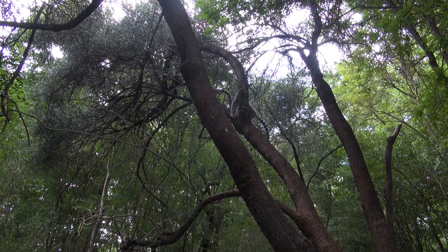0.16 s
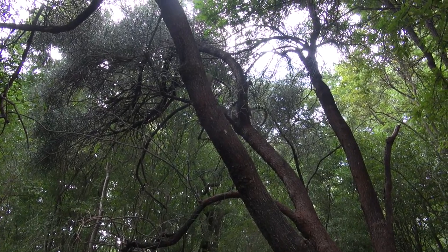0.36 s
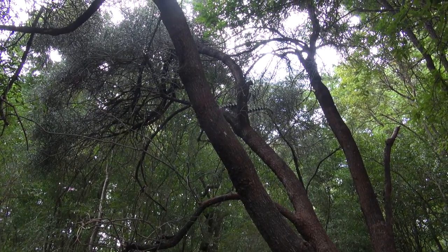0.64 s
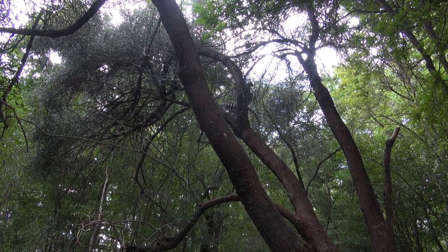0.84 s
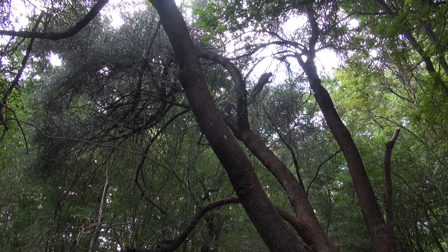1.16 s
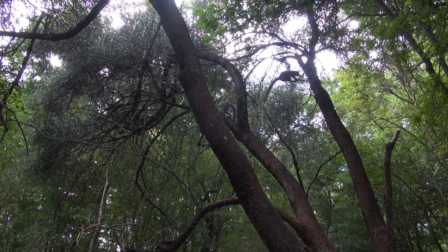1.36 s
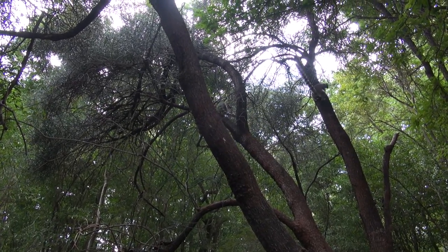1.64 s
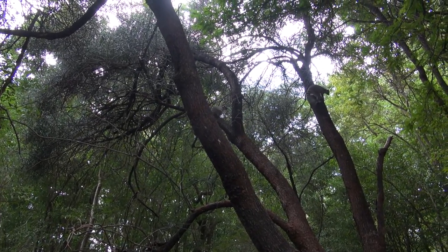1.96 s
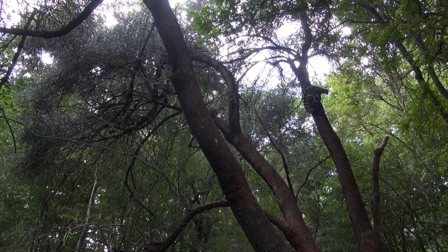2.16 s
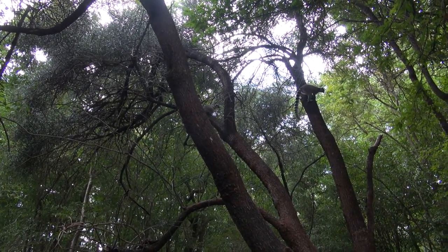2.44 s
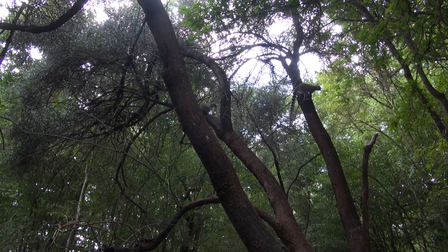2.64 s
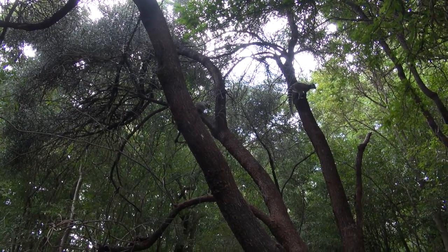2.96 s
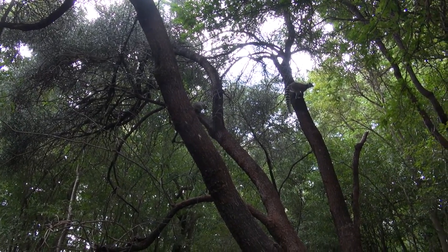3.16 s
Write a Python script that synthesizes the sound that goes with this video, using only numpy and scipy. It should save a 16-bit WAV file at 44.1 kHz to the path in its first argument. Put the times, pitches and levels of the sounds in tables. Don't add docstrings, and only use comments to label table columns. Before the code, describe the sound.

Lemur grunting softly in a forest, bark cracking and leaves rustling, a bird rasping four times

```python
import sys
import numpy as np
from scipy import signal
from scipy.fft import next_fast_len
from scipy.io import wavfile
from scipy.ndimage import uniform_filter1d

SR = 44100
rng = np.random.default_rng(int(sys.argv[2]) if len(sys.argv) > 2 else 0)


def attenuation_scalar(level_db):
    decades = np.asarray(level_db, float) / 20
    return 10 ** decades


def digitize_waveform(pressure):
    field = np.atleast_2d(pressure).T
    bounded = np.clip(field, -1, 1)
    quanta = np.round(bounded * 32767).astype(np.int16)
    wavfile.write(sys.argv[1], SR, quanta)


N = 145530

# (start [s], length [s], level [dB], pitch [Hz], roughness [0-1])
GRUNTS = [(-.012, 0.02, -51.5, 195.7, 0.33), (.4428, 0.023, -49.5, 241.5, 0.31),
          (.472, 0.013, -50, 279, 0.4), (.4825, 0.0069, -55, 349, 0.36), (.8485, 0.015, -44.5, 268.2, 0.24),
          (1.314, 0.013, -56.5, 184, 0.38), (1.453, 0.023, -45.5, 302, 0.37),
          (2.2705, 0.004, -60, 249, 0.23), (2.278, 0.0036, -54, 308, 0.35),
          (2.289, 0.0076, -50.5, 265, 0.34), (2.533, 0.015, -58.5, 206.3, 0.54),
          (2.881, 0.016, -55.5, 203.6, 0.09), (2.9998, 0.013, -46.5, 301, 0.29),
          (3.0162, 0.0098, -46, 261, 0.44), (3.033, 0.0089, -70, 288, 0.4)]
# (start [s], length [s], level [dB], pitch [Hz], roughness [0-1])
MUTTERS = [
    (1.567, 0.0087, -58, 172, 0.32),
    (1.686, 0.016, -53, 179, 0.33),
    (1.802, 0.029, -54.5, 182.2, 0.33),
    (1.917, 0.014, -56, 176.2, 0.41),
    (2.034, 0.027, -64.5, 180.8, 0.38),
    (2.150, 0.01, -59.5, 182.4, 0.31),
    (2.399, 0.015, -61.5, 176.2, 0.38),
    (2.462, 0.013, -60.5, 179.4, 0.29),
    (2.596, 0.0079, -62.5, 181, 0.36),
]
# (centre [multiple of pitch], width [Hz], level [dB])
OPEN_THROAT = [(1.05, 310, 7.5), (2.0, 360, 7), (2.9, 300, -3)]
# (centre [multiple of pitch], width [Hz], level [dB])
SHUT_THROAT = [(1.4, 380, 6), (3.0, 190, 8), (4.2, 450, 0)]
# (centre [Hz], width [Hz], level [dB])
NOSE = [(1537, 870, -1), (3307, 1420, -3.5), (5300, 1500, -6.5), (7570, 1500, -1), (9170, 2800, 0),
        (11300, 3000, -10)]
# (time [s], peak level [dB], pitch [Hz], ring to -60 dB [s])
CLICKS = [(0.0362, -31.5, 8600, 0.0032), (0.0867, -44.5, 6120, 0.0099), (0.2623, -35, 5400, 0.0067),
          (0.4429, -34.5, 9050, 0.0055), (0.4489, -30, 5520, 0.0055), (0.4643, -35, 9440, 0.0084),
          (0.848, -39, 6600, 0.0064), (0.8684, -41, 6640, 0.008), (1.1188, -39, 7600, 0.017),
          (1.3135, -34, 8520, 0.0058), (1.9155, -40, 7500, 0.0096), (2.0338, -38.5, 7400, 0.0059),
          (2.0953, -45.5, 6600, 0.017), (2.1492, -42, 7610, 0.0075), (2.2749, -35, 9030, 0.015),
          (2.3343, -44, 6760, 0.013), (2.3984, -43.5, 8160, 0.0093), (2.4613, -44.5, 7700, 0.012),
          (2.5302, -41.5, 6820, 0.023), (2.596, -42, 7850, 0.011), (2.8805, -46, 5620, 0.0094),
          (3.002, -33, 7100, 0.0055), (3.0218, -40, 7000, 0.0052)]
# (time [s], peak level [dB], pitch [Hz], ring to -60 dB [s])
SNAPS = [
    (1.0980, -17, 8000, .003),
    (.8942, -24, 5200, .004),
    (1.4532, -31, 9600, .01),
    (1.4675, -40, 9400, .008),
    (1.5215, -44, 8000, .006),
    (1.64, -44, 7600, .006),
    (1.801, -48, 8500, .008),
    (3.028, -40, 8800, .008),
    (3.0025, -42, 3450, .014),
    (3.023, -41, 3450, .014),
]
# (start [s], length [s], level [dB], centre [Hz], width [Hz])
RUSTLES = [(.015, .041, -56, 6850, 7140), (.215, .022, -60, 6600, 6000), (.262, 0.031, -55.5, 7600, 8300),
           (.905, 0.022, -57, 7550, 4000), (1.038, 0.052, -56.5, 7800, 7000),
           (1.062, 0.042, -54.5, 6850, 2930), (1.103, 0.024, -48.5, 7900, 4530),
           (1.113, 0.016, -53, 12100, 3000), (1.13, 0.053, -59.5, 8600, 7000),
           (1.19, .1, -61.5, 5040, 6060), (1.315, 0.021, -53, 8200, 7000), (3.03, 0.017, -52, 6000, 7000),
           (1.458, 0.043, -54, 3650, 900), (2.288, 0.015, -56.5, 1560, 600), (2.288, .012, -67, 2180, 600),
           (3.001, 0.023, -55.5, 3480, 700), (3.001, 0.013, -60, 5100, 900),
           (3.001, 0.027, -63, 7360, 1200)]
# (start [s], length [s], level [dB], start pitch [Hz], end pitch [Hz])
RASPS = [
    (1.412, 0.1, -47, 4230, 5530),
    (1.547, 0.061, -45.5, 4300, 5100),
    (1.633, 0.077, -46.5, 4240, 5050),
    (1.748, 0.084, -48.5, 4300, 4700),
]
# (frequency [Hz], time to -60 dB [s])
ECHO = [(250, 0.078), (1000, 0.35), (5000, 0.32), (12000, 0.09)]
# (centre [Hz], width [Hz], left level [dB], right level [dB], left lead [rad])
WHIR = [(936.7, 134, -59, -54.5, 1.8), (1035.2, 119, -61.5, -53.5, 2.14), (238.7, 36.6, -70, -68, 0.3),
        (313.3, 42.5, -66, -67.5, 1.06), (539, 59, -91.5, -70, 1.93)]
# (frequency [Hz], level [dB])
HUM = [(50, -78.5), (75, -85.5), (100, -81), (125, -82.5), (150, -88)]
# (frequency [Hz], level [dB per Hz])
HISS = [(30, -20), (190, -2.5), (270, 2.5), (700, -0.5), (1300, -5), (6000, -10.5), (13000, -13.5),
        (16000, -18.5)]
# (frequency [Hz], correlation [-1 to 1])
SAME = [(30, .94), (70, .72), (200, .55), (550, -.25), (1650, -.45), (4970, -.15), (15000, .12)]


def evened(x):
    return x / np.sqrt(np.mean(x ** 2) + 1e-20)


def read(points, hz):
    f, value = np.transpose(points)
    return np.interp(np.log(hz + 1), np.log(f + 1), value)


def add(mix, start_s, sound):
    at = round(start_s * SR)
    part = mix[max(at, 0):][:len(sound) + min(at, 0)]
    part += sound[max(-at, 0):][:len(part)]


def resonate(x, hz, width_hz, order=3):
    turn = np.exp(2j * np.pi * np.cumsum(hz * np.ones(len(x))) / SR)
    r = np.exp(-np.pi * width_hz / SR)
    z = x / turn
    for _ in range(order):
        z = signal.lfilter([1 - r], [1, -r], z)
    return 2 * (turn * z).real


def pulses(hz):
    turns = 0.8 + np.cumsum(hz) / SR
    return np.diff(np.floor(turns), prepend=0), turns % 1


def grunt(start, length, db, hz, rough, throat=OPEN_THROAT):
    lead_s, rise_s, fall_s = 0.012, 0.00028, 0.0026
    pitch_sag, jitter, uneven_db = 0.044, 0.13, 3
    hoarse, chest_cut_hz, open_per_s, nose_db = 0.7, 172, 15, -8.5
    t = np.arange(-lead_s, length + 0.012, 1 / SR)
    wobble_noise, hoarse_noise, breath_noise, uneven_noise = rng.standard_normal((4, len(t)))
    wobble = evened(uniform_filter1d(wobble_noise, 150))
    uneven = evened(uniform_filter1d(uneven_noise, 150))

    pitch = (t >= 0) * hz * (1 - pitch_sag * t / length) * (1 + jitter * rough * wobble)
    beats, phase = pulses(pitch)
    shape = np.clip(t / rise_s, 0, 1) * np.exp(-np.maximum(t - length, 0) / fall_s)
    shape = shape * attenuation_scalar(uneven_db * rough * uneven)

    drive = shape * np.array([-(1 - rough) * evened(beats), hoarse * rough * hoarse_noise])
    chest = signal.butter(2, chest_cut_hz, "high", fs=SR, output="sos")
    folds, rasping = signal.sosfiltfilt(chest, drive)

    mouth = 1 + open_per_s * rough * np.maximum(t, 0)
    voice = 0
    for n, (multiple, width_hz, gain_db) in enumerate(throat):
        centre = multiple * hz * mouth ** min(n, 1)
        ring = resonate(folds + (-1) ** n * rasping, centre, width_hz)
        voice = voice + attenuation_scalar(gain_db) * (2 * rough) ** (n // 2) * ring

    puffs = shape * breath_noise * (0.15 + np.exp(-phase / 0.3))
    breath = sum(attenuation_scalar(g_db) * evened(resonate(puffs, f, w)) for f, w, g_db in NOSE)
    sound = evened(voice) + rough * attenuation_scalar(nose_db) * breath
    return start - lead_s, attenuation_scalar(db) * np.sqrt(len(t) / SR / length) * sound


def mutter(*row):
    return grunt(*row, throat=SHUT_THROAT)


def click(start, db, hz, ring_s):
    overtone, overtone_db, crack_db, peak_db = 1.9, -12.5, 1, -4
    t = np.arange(600) / SR
    decay = attenuation_scalar(-60 * t / ring_s)
    crack = resonate(rng.standard_normal(600), 1.2 * hz, 0.65 * hz) * decay
    rings = np.sin(2 * np.pi * hz * t)
    rings = rings + attenuation_scalar(overtone_db) * np.sin(2 * np.pi * overtone * hz * t)
    tone = rings * decay * np.minimum(t / 0.0005, 1)
    return start, attenuation_scalar(db + peak_db) * (tone + attenuation_scalar(crack_db) * crack)


def rustle(start, length, db, hz, width_hz):
    ticks_per_s, spread_db, rise_share = 4500, 2.5, 0.13
    t = np.arange(0, 2 * length, 1 / SR)
    chance, side, size = rng.random((3, len(t)))
    ticks = (chance < ticks_per_s / SR) * np.sign(side - 0.5)
    ticks = ticks * attenuation_scalar(-spread_db * np.log(size + 0.0015))
    shape = np.minimum(t / (rise_share * length), 1) * np.exp(-(t / length) ** 2)
    return start, attenuation_scalar(db) * evened(resonate(ticks, hz, width_hz)) * shape


def rasp(start, length, db, from_hz, to_hz):
    pulses_per_s, jitter, roughness, bend = 205, 0.08, 0.58, 0.6
    t = np.arange(0, length, 1 / SR)
    wobble, air = rng.standard_normal((2, len(t)))
    beats, phase = pulses(pulses_per_s * (1 + jitter * evened(uniform_filter1d(wobble, 200))))
    rough = roughness * (0.5 + t / length)
    fluttering = evened(air * (1.2 + np.sin(np.pi * phase + 1.2) ** 2))
    drive = (1 - rough) * 0.45 * evened(beats) + rough * fluttering

    hz = from_hz + (to_hz - from_hz) * (t / length) ** bend
    beak = resonate(drive, hz, 1150)
    beak += attenuation_scalar(-12) * np.sqrt(t / length) * resonate(air, hz * 0.69, 750)
    beak += attenuation_scalar(-16.5) * resonate(air, hz * 1.225, 1800, order=2)
    beak += attenuation_scalar(-22.5) * resonate(air, 1880, 1900, order=2)
    shape = np.minimum(t / (0.45 * length), 1) ** 0.7 * np.minimum((length - t) / 0.02, 1)
    return start, attenuation_scalar(db) * evened(beak) * shape


def echo(x):
    taps = np.zeros((2, SR // 2))
    at = np.arange(300, SR // 2 - 20, 20)
    at = at + rng.integers(0, 20, (2, len(at)))
    np.put_along_axis(taps, at, rng.choice([-1., 1.], at.shape), 1)
    hz, t, z = signal.stft(taps, SR, nperseg=256)
    tail = signal.istft(z * attenuation_scalar(-60 * t / read(ECHO, hz)[:, None]), SR, nperseg=256)[1]
    return signal.fftconvolve(x[None], tail / np.linalg.norm(tail[0]), axes=1)[:, :N]


def played(table, source, wet_db, pan_db):
    mix = np.zeros(N)
    for row in table:
        add(mix, *source(*row))
    return mix * attenuation_scalar(np.array([[pan_db], [-pan_db]])) + attenuation_scalar(wet_db) * echo(mix)


def motor():
    out, t = np.zeros((2, N)), np.arange(N) / SR
    like = 0.98
    for hz, width_hz, left_db, right_db, lead in WHIR:
        shared, own = (evened(resonate(v, hz, width_hz)) for v in rng.standard_normal((2, N)))
        turned = (signal.hilbert(shared, next_fast_len(N))[:N] * np.exp(1j * lead)).real
        left = like * turned + np.sqrt(1 - like ** 2) * own
        out += [attenuation_scalar(left_db) * left, attenuation_scalar(right_db) * shared]
    for hz, db in HUM:
        out += attenuation_scalar(db) * np.sqrt(2) * np.sin(2 * np.pi * (hz * t + rng.random()))
    return out


def hiss():
    level_db, patchy_db = -55.5, 0.8
    frames, hz = N // 256 + 5, np.fft.rfftfreq(1024, 1 / SR)
    a, b, c, d, patches = rng.standard_normal((frames, 513, 5)).T
    patches = evened(uniform_filter1d(uniform_filter1d(patches, 14, 0), 16, 1))
    same = read(SAME, hz)[:, None]
    left = a + 1j * b
    right = same * left + np.sqrt(1 - same ** 2) * (c + 1j * d)
    z = np.array([left, right]) * attenuation_scalar(read(HISS, hz)[:, None] + patchy_db * patches)
    return attenuation_scalar(level_db) * evened(signal.istft(z, nperseg=1024, noverlap=768)[1][:, :N])


def scene():
    lemur = played(GRUNTS, grunt, -9.5, pan_db=1.04) + played(MUTTERS, mutter, -9.5, pan_db=1.0)
    snaps = played(CLICKS, click, -7, pan_db=0.3) + played(SNAPS, click, -11, pan_db=2.2)
    leaves = played(RUSTLES, rustle, -7, pan_db=-0.3)
    bird = played(RASPS, rasp, -8.5, pan_db=-0.5)
    return lemur + snaps + leaves + bird + motor() + hiss()


def low_pass(x):
    return signal.sosfilt(signal.butter(12, 16110, fs=SR, output="sos"), x)


def record(dry):
    edge = signal.firwin(1023, 15830, window=("kaiser", 9), fs=SR)
    cut = signal.oaconvolve(dry, edge[None], "same")
    return low_pass(cut)


dry = scene()
out = record(dry)
digitize_waveform(out)
```